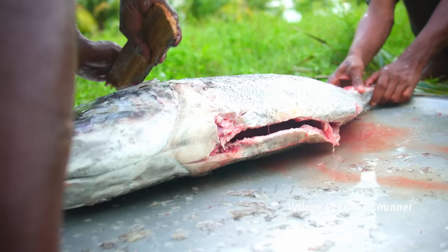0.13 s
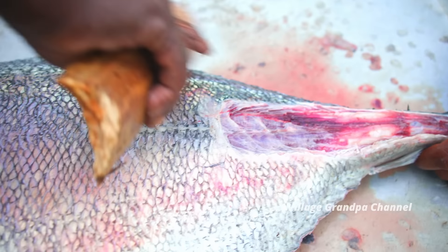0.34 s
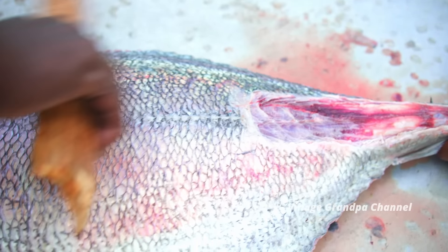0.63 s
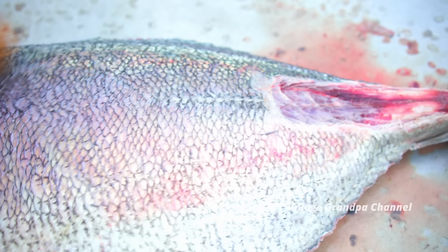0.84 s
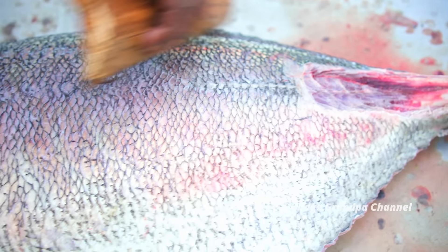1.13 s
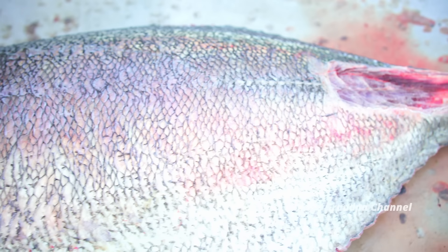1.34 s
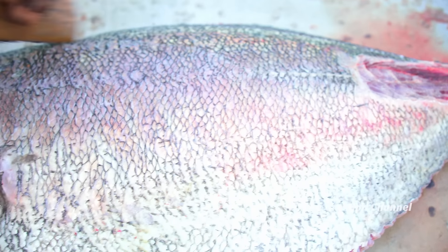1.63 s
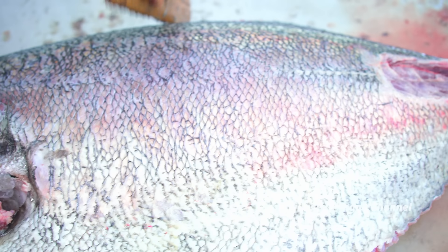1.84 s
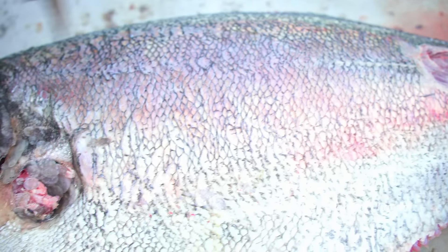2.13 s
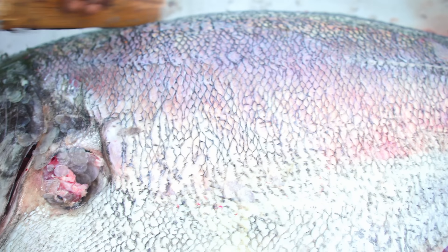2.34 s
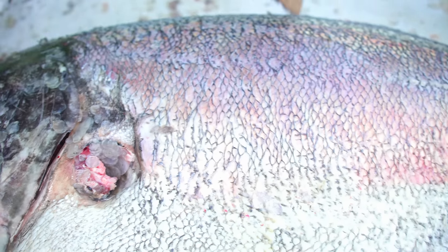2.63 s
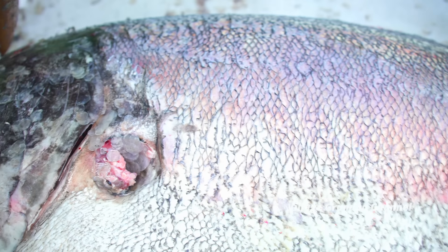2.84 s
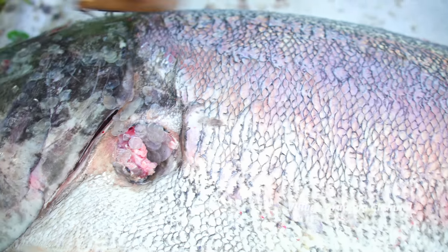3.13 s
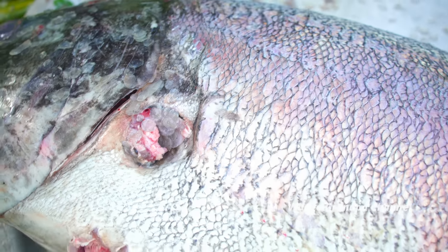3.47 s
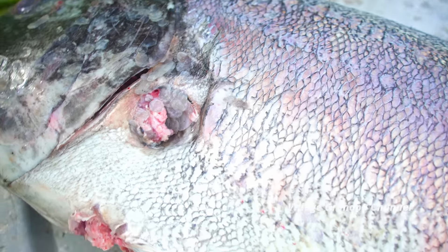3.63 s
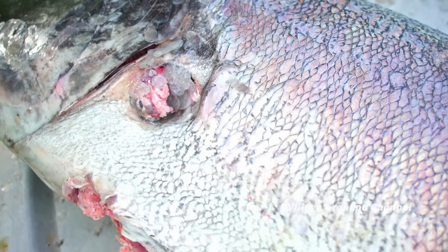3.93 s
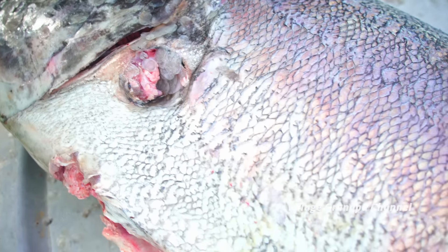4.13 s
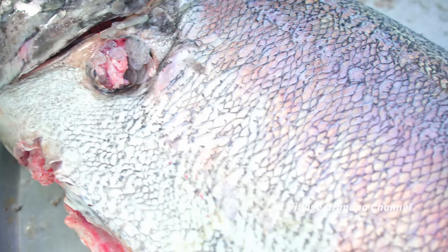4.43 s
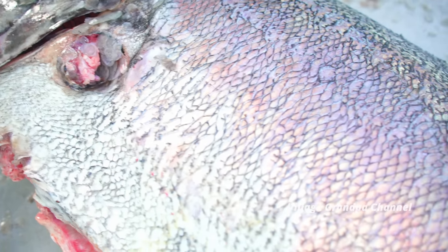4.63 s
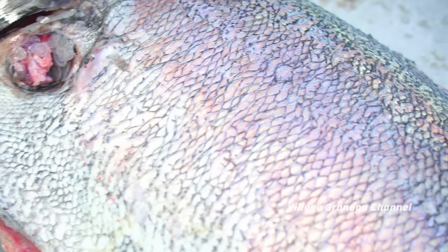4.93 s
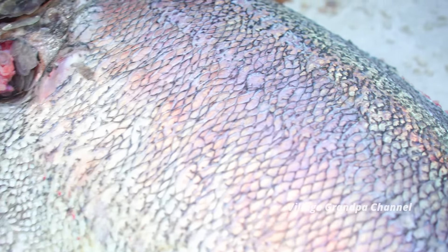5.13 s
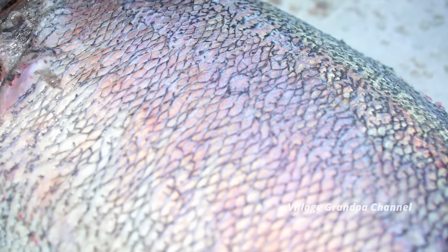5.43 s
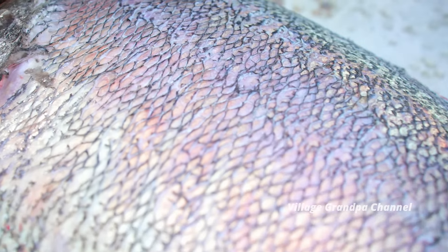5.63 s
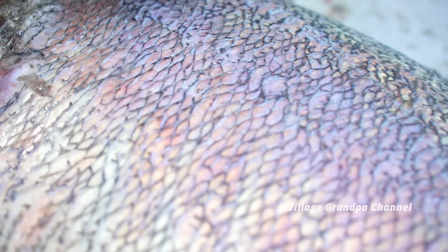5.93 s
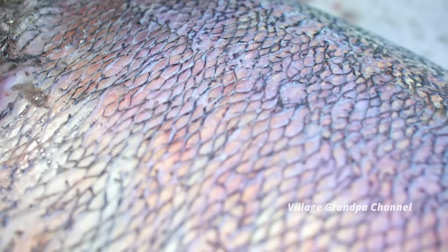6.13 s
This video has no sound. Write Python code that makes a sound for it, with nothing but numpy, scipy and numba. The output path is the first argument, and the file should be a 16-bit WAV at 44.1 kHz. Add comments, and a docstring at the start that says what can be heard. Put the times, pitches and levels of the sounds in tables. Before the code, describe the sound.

A wooden scraper rasps scales off a large fish in quick, crackling strokes, close by, over faint outdoor air.

```python
"""Scaling a large fish

A wooden scraper is pushed against the scales, close by, outdoors, nearly three strokes a second.
In each stroke the edge drags, skips and bites again; scales flick up in a dense crackle and some
snap off loudly. The crackle rings the wood, the hollow under the hand and the soft body of the
fish, over faint open air."""
import sys
import numpy as np
from scipy import signal
from scipy.fft import rfft, irfft
from scipy.io import wavfile
from scipy.ndimage import uniform_filter1d
from numba import njit

SR = 44100
rng = np.random.default_rng(int(sys.argv[2]) if len(sys.argv) > 2 else 0)


def log_audio(samples):
    """Write samples as a 16-bit WAV file to the path given in sys.argv[1]."""
    # one column per channel
    frames = np.atleast_2d(samples).T
    # limit to full scale, then quantise
    limited = np.clip(frames, -1, 1)
    pcm = np.round(limited * 32767).astype(np.int16)
    wavfile.write(sys.argv[1], SR, pcm)


N = 277609
TIME = np.arange(N) / SR

# Pushes of the scraper. Each row: start, swell and release in seconds, top force and chatter in dB,
# pitch of the hollow and of the wood in Hz, then the strength of the fish's body, the hollow,
# the wood and the scale's tick, in dB against the edge's ring.
STROKES = [(.031, 0.047, 0.14, -10, 1, 513, 1290, -9.5, -12.5, -0.5, -7),
           (0.19, 0.088, .032, -31, 6, 653.4, 1353, 7, -3.5, 1, 4),
           (0.323, 0.051, 0.045, -27.5, -1.5, 623.6, 1777, -25, -16.5, -6.5, -7.5),
           (0.434, 0.075, 0.0883, -15.5, 3, 920, 1680, -9, -6.5, 4.5, -8),
           (0.619, 0.058, 0.067, -29, -1, 810, 1745, -12, -9, -2, -4.5),
           (.752, 0.087, 0.11, -15.5, 1.5, 930, 1665, -2.5, -0.5, 5.5, -4),
           (1.161, 0.052, 0.13, -15, 3, 763, 1653, -13, -12, 0, -6),
           (1.6, 0.024, 0.087, -19.5, 0.5, 880, 1690, -10.5, -7.5, -5, -4),
           (1.934, 0.046, 0.13, -25.5, 0.5, 773, 1720, -6.5, -9.5, -3.5, -2.5),
           (2.336, 0.031, 0.12, -23.5, 7, 743, 1605, -5.5, -10.5, -4.5, -3),
           (2.722, 0.072, 0.077, -21.5, 5.5, 695, 1950, -6, -9, -2, 1),
           (3.112, 0.046, 0.064, -25, 3, 680, 1740, -6.5, -16, -6, -7),
           (3.471, 0.034, 0.057, -18, 2.5, 663.6, 1906, -7.5, -16.5, -3.5, 0),
           (3.823, 0.023, 0.09, -21, 7, 641.5, 1716, -4.5, -14.5, -7, -4),
           (4.180, 0.032, 0.042, -22.5, 5.5, 720, 1400, -7, -11.5, -8, -2.5),
           (4.52, 0.03, 0.026, -17, 2, 654, 1760, -7, -14.5, -8, -4),
           (4.867, .040, 0.055, -24.5, 7, 657.5, 1790, -7, -15.5, -4, -7.5),
           (5.198, 0.05, 0.094, -27.5, 10, 684, 1673, -2, -8, 0.5, -2.5),
           (5.578, 0.052, 0.082, -22.5, 0.5, 750, 1710, -4, -7, 1, -2.5),
           (5.911, 0.082, 0.036, -19.5, 3, 972, 1570, -0.5, -8.5, 1, -6)]
# Scales that snap off at set times, from loud cracks to faint ticks.
# Each row: time in seconds, level in dB, tick against knock in dB.
SNAPS = [(0.0441, -12, -16.5), (.1603, -6, 3.5), (0.4437, -20, -7.5), (0.4645, -12, -7.5),
         (1.1845, -15, -23), (1.337, -27, -2), (1.5510, -26, -10), (1.5759, -13.5, -5), (1.5891, -21, -8),
         (1.609, -25.5, 0.5), (1.9432, -24, -29), (1.9676, -16, -11), (2.3479, -14, -1), (2.3724, -12, 2),
         (2.3824, -11.5, -13), (2.4602, -29.5, 7), (2.5191, -45, 3), (2.7362, -11.5, -17),
         (2.7628, -11, -16), (2.7741, -15, 13), (2.7847, -12, -19), (3.1055, -30.5, -3),
         (3.1477, -17.5, -8), (3.1962, -19, 0), (3.2524, -39, -1), (3.4575, -15, -8), (3.439, -27.5, 0),
         (3.4877, -10.5, -1.5), (3.7932, -41, -5), (3.8299, -14, -4), (3.8587, -13.5, -6), (4.2073, -15, 7),
         (4.2191, -20, 2), (4.4988, -38, -1.5), (4.5419, -13.5, -1), (4.8607, -38, -12), (4.8901, -13, -6),
         (5.2184, -19, -22), (5.2657, -16, -7.5), (5.583, -19.5, -8), (5.9228, -22.5, 4),
         (6.0707, -32.5, 4)]
# The edge skips and bites again. Each row: start in seconds, length in seconds, force in dB.
BITES = [(1.569, .011, -21), (1.962, 0.018, -13.5), (1.996, 0.017, -18.5), (2.355, 0.011, -13.5),
         (2.687, .018, -30), (3.456, 0.0075, -18), (3.54, 0.014, -24.5), (3.805, 0.013, -29),
         (3.882, 0.02, -21), (3.929, 0.023, -34.5), (4.150, 0.062, -44), (4.269, .02, -27),
         (4.572, 0.017, -18), (4.592, 0.0097, -26), (4.933, 0.016, -20.5), (4.971, 0.019, -28),
         (5.557, .018, -34.5), (5.584, 0.026, -20.5), (5.660, 0.038, -23), (6.030, 0.035, -26)]
# How the fish's flesh and belly ring. Each row: pitch in Hz, width in Hz, relative level in dB.
BODY_RINGS = [(162, 290, -8), (305, 29, -15.5), (321, 64, -14), (497, 270, -16.5)]
# How a flicked scale rings. Each row: pitch in Hz, width in Hz, relative level in dB.
SCALE_RINGS = [(5770, 3500, -5), (8330, 1800, -4), (13300, 2300, -11)]


def scraping(force, sag_octaves=0.24, dig_db=5, waver=0.033, patchy_db=2, tail_samples=4096):
    """Every flicked scale rings the fish, hollow, wood, edge and scale, each with its own strength."""
    crackle, out = flicks() * force, np.zeros(N)
    count = len(stroke_rings(STROKES[0])[0])
    # no two scales are alike, so each ring wavers in strength and, above the body's, in pitch
    detune = [np.exp(waver * walk(70)) for _ in range(count)]
    strength = [np.sqrt(3) * rng.uniform(-0.77, 1, N) * undb(patchy_db * walk(170))
                for _ in range(count)]
    bounds = [int(at * SR) for at in grip_changes()] + [N]
    for stroke, start, end in zip(STROKES, bounds, bounds[1:]):
        rings, joint_gain = stroke_rings(stroke)
        span = slice(start, min(end + tail_samples, N))
        touching = np.arange(N)[span] < end
        travel = np.cumsum(force[span] * touching)
        travel = travel / travel[-1] - .5  # runs from -0.5 to 0.5 over the stroke
        for k, (hz, width, db) in enumerate(rings):
            push = crackle[span] * strength[k][span] * touching
            if k < len(BODY_RINGS):  # the flesh is loaded more and more as the edge digs in
                push = push * undb(dig_db * travel)
            else:
                hz = hz * detune[k][span]
            if k == len(BODY_RINGS):  # the hollow closes and its pitch sinks
                hz = hz * 2 ** (-sag_octaves * travel)
            add(out, start, ring(push, hz, width, db) / joint_gain)
    return out


def flicks(per_second=2700, scatter_db=2.5, row_db=3, rustle_s=0.0093, rustle_db=-5, even_s=0.011):
    """Scales flick free at random, in bunches as the edge crosses their rows."""
    freed = rng.random(N) < per_second / SR
    power = freed * undb(scatter_db * rng.standard_normal(N) + row_db * walk(200)) ** 2
    # each lifted scale rustles briefly against its neighbours
    decay = np.exp(-1 / (rustle_s * SR))
    power = power + undb(rustle_db) ** 2 * signal.lfilter([1 - decay], [1, -decay], power)
    return np.sqrt(power / (smooth(power, even_s) + 1e-9))  # the hand keeps the average force


def stroke_rings(stroke):
    """Lists what rings in one grip on the fish, and the joint gain of all but the body."""
    # How the scraping edge rings. Each row: pitch in Hz, width in Hz, relative level in dB.
    edge_rings = [(2882, 1960, 0)]
    hollow_hz, wood_hz, body_db, hollow_db, wood_db, tick_db = stroke[5:]
    rings = [(hz, width, db + body_db) for hz, width, db in BODY_RINGS]
    rings += [(hollow_hz, 400, hollow_db), (wood_hz, 720, wood_db)] + edge_rings
    rings += [(hz, width, db + tick_db) for hz, width, db in SCALE_RINGS]
    return rings, np.linalg.norm(undb([0, hollow_db, wood_db, tick_db]))


def grip_changes():
    """Times in seconds when the hand takes each grip: at 0, then halfway through each pause."""
    start, swell, release = np.transpose(STROKES)[:3]
    end = start + swell + release
    return np.r_[0, (start[1:] + end[:-1]) / 2]


def pressure(bite_fade_db=-13):
    """Force of the edge on the scales: long drags, sudden bites and soft brushes."""
    # Light brushes as the scraper is drawn back. Each row: middle and length in seconds, force in dB.
    brushes = [(.005, 0.091, -41.5), (.225, 0.096, -35.5), (.985, .03, -48.5), (1.893, 0.026, -48.5),
               (1.934, 0.039, -45), (2.162, 0.053, -46), (2.288, 0.032, -49), (2.932, 0.034, -48),
               (4.108, 0.033, -40), (4.357, 0.022, -51.5), (5.161, 0.02, -46.5), (5.39, 0.065, -53.5),
               (6.295, 0.043, -34.5)]
    force = drags()
    for at, length, db in BITES:
        on = (TIME >= at) & (TIME < at + length)
        bite = undb(db + bite_fade_db * ((TIME[on] - at) / length) ** 2)
        force[on] = np.maximum(force[on], bite)
    for at, length, db in brushes:
        on = np.abs(TIME - at) < length / 2
        brush = undb(db) * np.cos(np.pi * (TIME[on] - at) / length)
        force[on] = np.maximum(force[on], brush)
    return smooth(force * hesitation(), seconds=0.0014)


def drags(touch_db=-16.5, leave_db=-32.5, slide_db=-31, slide_s=0.01, settling=0.29):
    """Each stroke swells, lets go and slides off; the edge chatters most as it digs in."""
    force, catch = np.zeros(N), chatter()
    for start, swell, release, top_db, chatter_db, *_ in STROKES:
        on = (TIME >= start) & (TIME < start + 0.5)
        since_top = TIME[on] - start - swell
        to_rise = np.clip(-since_top / swell, 0, 1)
        fallen = np.clip(since_top / release, 0, 1)
        arch = undb(touch_db * to_rise ** 2.4 + leave_db * fallen ** 2.3)  # higher powers flatten it
        slide_off = undb(slide_db) * np.exp(-np.abs(since_top - release) / slide_s)
        shape = np.where(since_top < release, arch, slide_off)
        force[on] += shape * undb(top_db + chatter_db * catch[on] * (1 - settling * fallen))
    return force


def chatter(gap_s=0.015, spread=0.5, count=2000):
    """The edge sticks and slips: this jumps to 1 at each catch and sinks to -1 before the next."""
    gaps = gap_s * np.exp(spread * rng.standard_normal(count))
    catches = np.r_[0, np.cumsum(gaps)]
    return 1 - 2 * (np.interp(TIME, catches, np.arange(count + 1)) % 1)


def hesitation(skip_s=0.009, skip_db=-16.5, hang_s=0.005, hang_db=-5.5):
    """The rasp dips as the edge lifts before a bite, or hangs on a scale around each snap in SNAPS."""
    gain = np.ones(N)
    for at, *_ in BITES:
        gain[(TIME >= at - skip_s) & (TIME < at)] = undb(skip_db)
    for at, *_ in SNAPS:
        gain[np.abs(TIME - at) < hang_s] = undb(hang_db)
    return gain


def snapping(snaps, flutter_s=0.0059, flutter_db=-24, body_db=-8, detune=0.11, size=1024):
    """A scale tears out with one sharp crack, rings at pitches of its own and flutters briefly."""
    out, grips = np.zeros(N), grip_changes()
    flutter = undb(flutter_db) * np.exp(-np.arange(size) / SR / flutter_s)
    attack = slice(int(.0025 * SR))  # levels are set on this first instant
    body_end, scale_start = len(BODY_RINGS), -len(SCALE_RINGS)
    for at, level_db, tick_db in snaps:
        rings, _ = stroke_rings(STROKES[np.sum(grips <= at) - 1])
        tear = signal.unit_impulse(size) + flutter * rng.standard_normal(size)
        shifts = np.exp(detune * rng.standard_normal(len(rings)))
        signs = rng.choice([-1, 1], len(rings))
        tones = [sign * ring(tear, hz * shift, width * 0.97, db)
                 for (hz, width, db), shift, sign in zip(rings, shifts, signs)]
        knock = sum(tones[body_end:scale_start]) + undb(body_db) * sum(tones[:body_end])
        tick = sum(tones[scale_start:])
        snap = knock / rms(knock[attack]) + undb(tick_db) * tick / rms(tick[attack])
        add(out, int(at * SR), snap * undb(level_db) / rms(snap[attack]))
    return out


def random_snaps(force, over_db=4, tick_db=-4, scatter_db=5, lightest_db=-48, hardest_db=-24, tries=260):
    """More scales snap at random where the edge runs lightly; gives rows like those of SNAPS."""
    places = rng.integers(0, N, tries)
    scatter = scatter_db * rng.standard_normal((tries, 2))
    return [(i / SR, 20 * np.log10(force[i]) + over_db + louder, tick_db + brighter)
            for i, (louder, brighter) in zip(places, scatter)
            if undb(lightest_db) < force[i] < undb(hardest_db)]


def thumping(sag_octaves=0.07, wobble=0.13, rough_db=4.5):
    """The soft body gives way and shudders under a heavy push, with a falling, unsteady pitch."""
    # Each row: middle in seconds, pitch there in Hz, level in dB, spread of the swell (Gaussian sigma) in
    # seconds.
    thumps = [(.168, 320, -23, 0.024), (3.516, 305, -32, .022), (4.232, 310, -37, 0.016),
              (5.268, 129.9, -37, .005), (6.008, 115, -24, .002)]
    out = np.zeros(N)
    unsteady = np.exp(wobble * walk(220))
    rough = undb(rough_db * walk(150))
    for at, hz, db, half_s in thumps:
        near = np.abs(TIME - at) < np.pi * half_s
        offset = (TIME[near] - at) / half_s
        pitch = hz * 2 ** (-sag_octaves * offset) * unsteady[near]
        swell = undb(db) * np.sqrt(2) * np.exp(-offset ** 2 / 2)
        out[near] += swell * np.sin(2 * np.pi * np.cumsum(pitch) / SR) * rough[near]
    return out


def rocking(force, smooth_s=0.042, give=0.55):
    """The heavy fish rocks on its board, with a dull rumble that grows more slowly than the force."""
    rumble = ring(rng.standard_normal(N), hz=40, width=60, db=-44)
    return rumble * smooth(force, smooth_s) ** give


def loose_scales(peak_per_second=26, flight_s=0.06, scatter_db=5):
    """Flung scales land with faint ticks, most of them soon after a stroke."""
    ends = [start + swell + release for start, swell, release, *_ in STROKES]
    falling = sum((TIME > end) * np.exp(-np.abs(TIME - end) / flight_s) for end in ends)
    landed = rng.random(N) < peak_per_second * falling / SR
    taps = landed * undb(scatter_db * rng.standard_normal(N))
    return ring(taps, hz=3800, width=6000, db=-39)


def surroundings(sound, db=-26.5, fade_s=0.08, dull_hz=2600, size=16384):
    """Sound scatters back with less treble and dies away by 60 dB in fade_s seconds."""
    tail = rng.standard_normal(size) * undb(-60 * np.arange(size) / SR / fade_s)
    tail = signal.sosfilt(signal.butter(1, dull_hz, fs=SR, output="sos"), tail)
    return signal.fftconvolve(sound, tail * undb(db) / np.linalg.norm(tail))[:N]


def air(start_db=-61, calming_db=3):
    """A soft outdoor hiss that slowly calms."""
    # The tone of open air. Each row: frequency in Hz, relative level in dB.
    air_tone = [(110, -30), (180, 0), (460, -8.5), (736, -12.5), (1450, -14), (3500, -20), (3840, -19),
                (9820, -25.5), (12500, -31.5), (16000, -38)]
    points_hz, points_db = np.transpose(air_tone)
    hz = np.arange(N // 2 + 1) * SR / N
    colour = undb(np.interp(np.log(hz + 1), np.log(points_hz), points_db))
    hiss = irfft(rfft(rng.standard_normal(N)) * colour, N)
    return hiss / rms(hiss) * undb(start_db - calming_db * TIME / TIME[-1])


def breeze(gust_db=3):
    """Moving air makes a low, uneven rumble."""
    # The strength of the breeze. Each row: time in seconds, level before gusts in dB.
    breeze_levels = [(0, -46.5), (.4, -55), (1.5, -53.5), (2.75, -52), (2.95, -38), (3.1, -47.5),
                     (4.6, -51), (5.3, -51.5), (6.29, -47.5)]
    rumble = ring(rng.standard_normal(N), hz=14, width=20, db=0)
    return rumble * undb(np.interp(TIME, *np.transpose(breeze_levels)) + gust_db * walk(6))


def ring(x, hz, width, db):
    """Rings x around one pitch, width in Hz; at 0 dB white noise keeps about the same power."""
    centre = np.minimum(hz * np.ones(len(x)), .45 * SR)
    once = band(x, centre, float(width))
    return band(once, centre, float(width)) * undb(db) * np.sqrt(2 * SR / np.pi / width)


@njit
def band(x, hz, width):
    """A filter that passes a band around a moving pitch, with gain 1 at its centre."""
    out, band_state, low_state = np.empty(len(x)), 0., 0.
    for i in range(len(x)):
        angle = 2 * np.pi * hz[i] / SR
        step = np.tan(angle / 2)
        damping = width / hz[i] * angle / np.sin(angle)
        swing = (band_state + step * (x[i] + 1e-18 - low_state)) / (1 + step * (step + damping))
        band_state = 2 * swing - band_state
        low_state += 2 * step * swing
        out[i] = damping * swing
    return out


def walk(per_second):
    """Random levels around zero, joined by straight lines; their spread is near 1."""
    return 0.91 * np.interp(TIME * per_second, np.arange(N), rng.standard_normal(N))


def smooth(x, seconds):
    """A running average, never below zero."""
    return np.abs(uniform_filter1d(x, int(seconds * SR)))


def undb(db):
    """Turns decibels into a gain."""
    return 10 ** (np.asarray(db) / 20)


def rms(x):
    """The average strength of a signal (root mean square)."""
    return np.sqrt(np.mean(x ** 2) + 1e-20)


def add(track, start, sound):
    """Mixes a sound into the track from a given sample on."""
    part = sound[:max(N - start, 0)]
    track[start:start + len(part)] += part


def scene():
    """Scraping, snaps and thumps close by, in the open air."""
    force = pressure()
    fish = scraping(force) + snapping(list(SNAPS) + random_snaps(force))
    fish = fish + thumping() + rocking(force) + loose_scales()
    return (fish + surroundings(fish) + air() + breeze())[None]


def record(dry):
    """The loudest cracks clip, and the treble above 16000 Hz is cut."""
    treble_cut = signal.ellip(8, .2, 70, 16000, fs=SR, output="sos")
    return signal.sosfilt(treble_cut, np.clip(dry, -1, 1))


dry = scene()
out = record(dry)
log_audio(out)
```